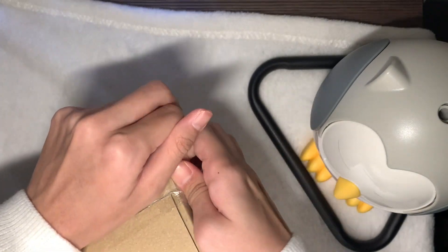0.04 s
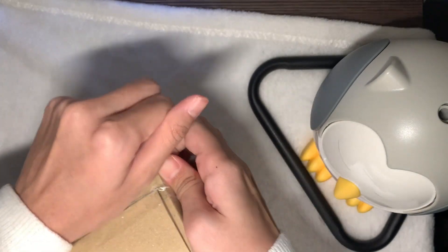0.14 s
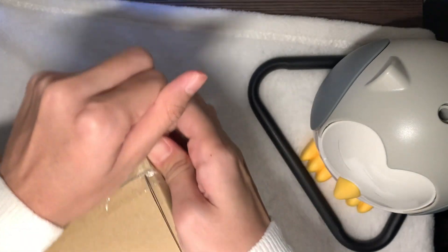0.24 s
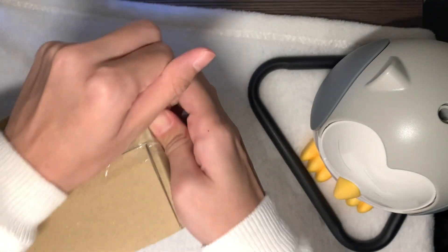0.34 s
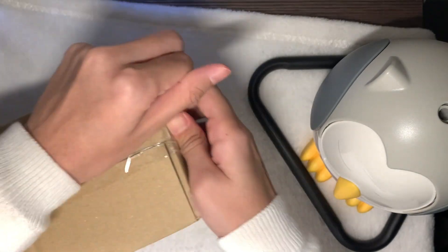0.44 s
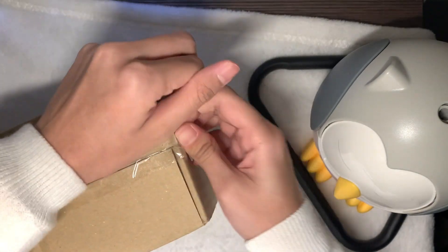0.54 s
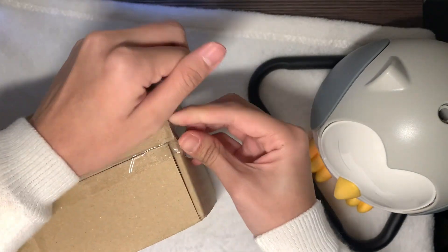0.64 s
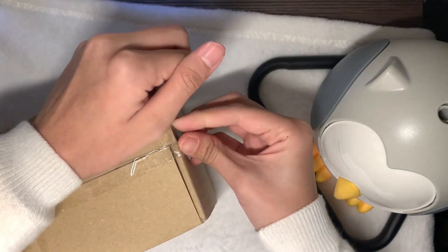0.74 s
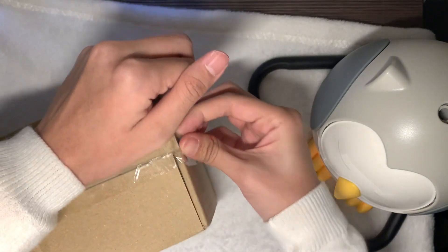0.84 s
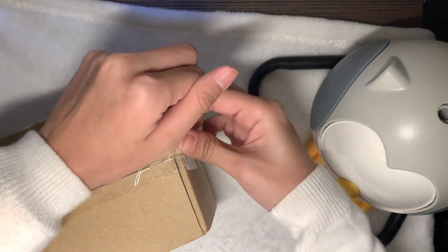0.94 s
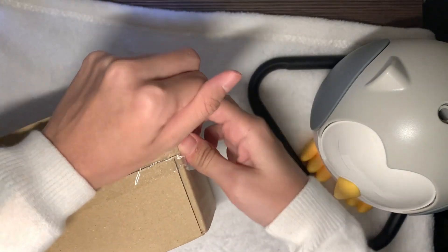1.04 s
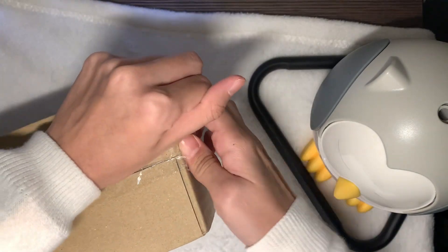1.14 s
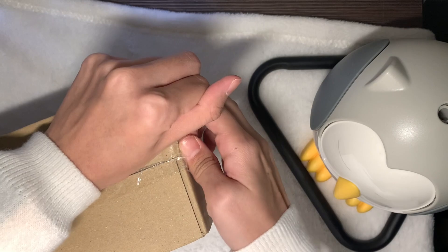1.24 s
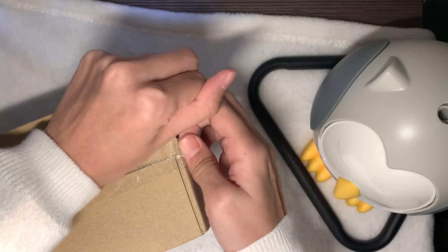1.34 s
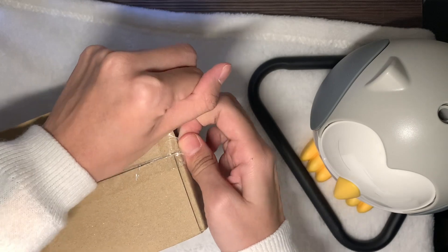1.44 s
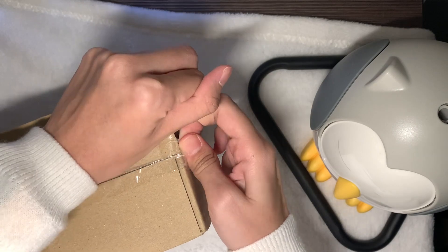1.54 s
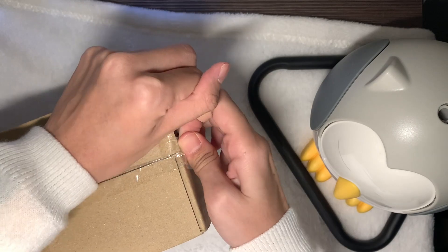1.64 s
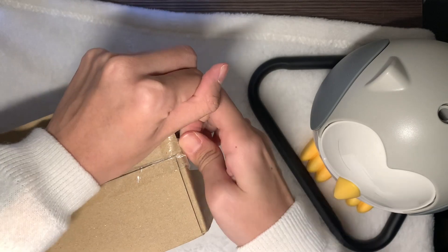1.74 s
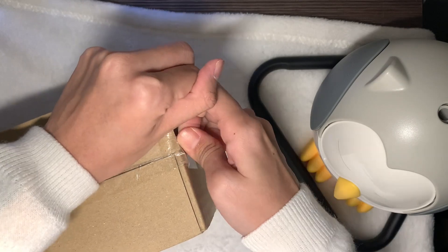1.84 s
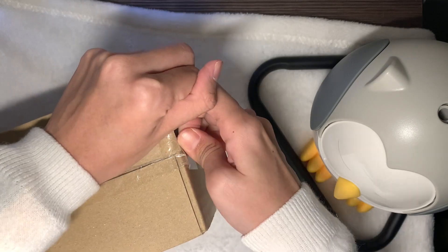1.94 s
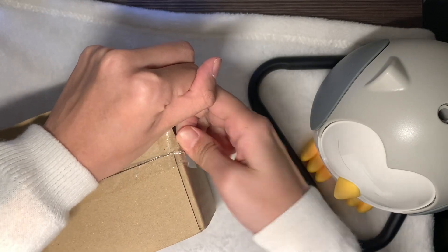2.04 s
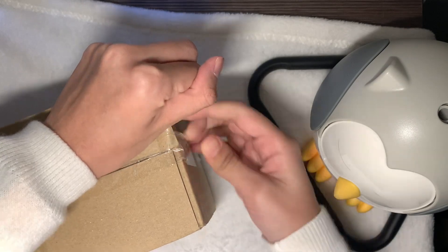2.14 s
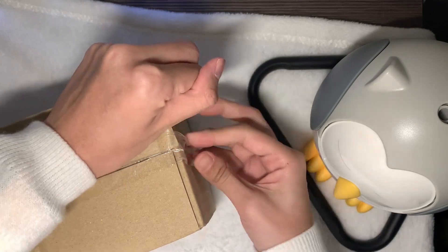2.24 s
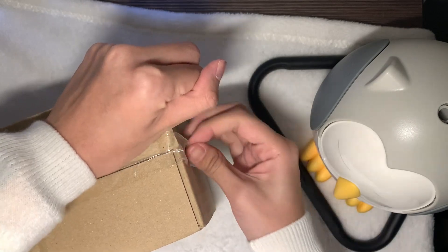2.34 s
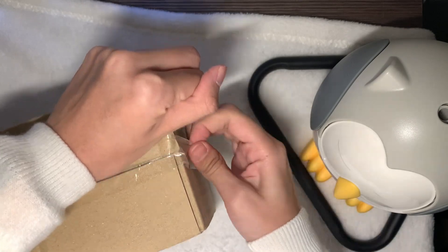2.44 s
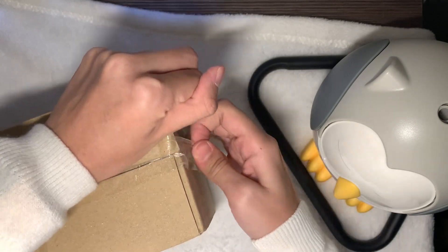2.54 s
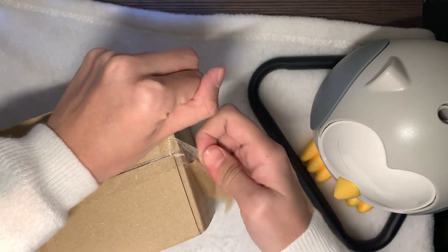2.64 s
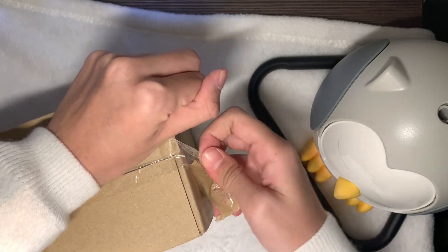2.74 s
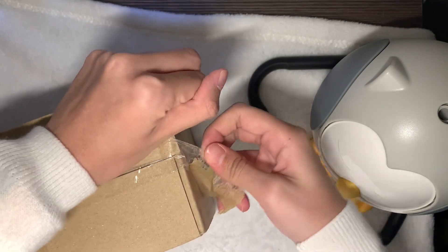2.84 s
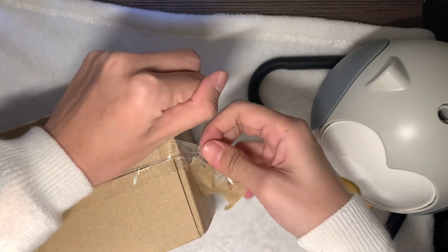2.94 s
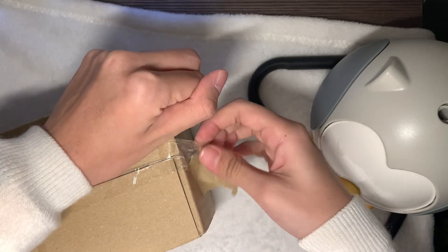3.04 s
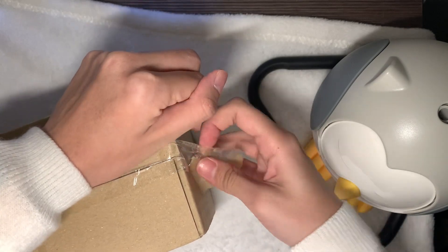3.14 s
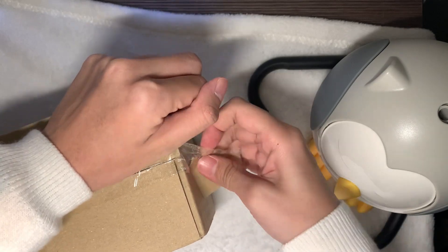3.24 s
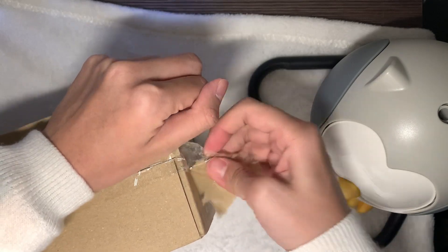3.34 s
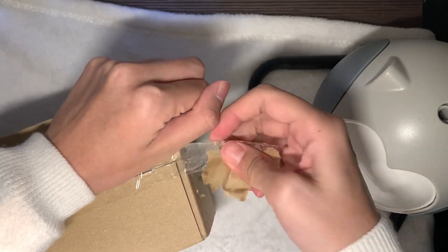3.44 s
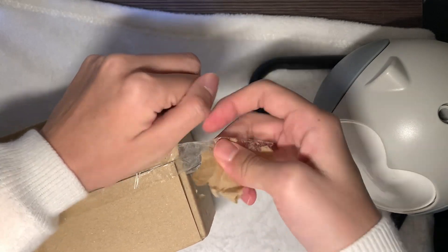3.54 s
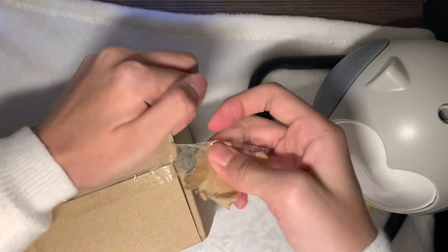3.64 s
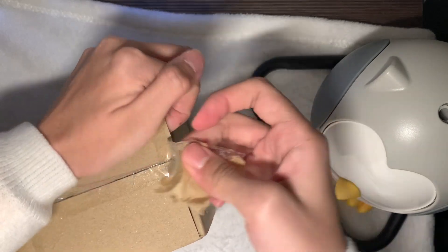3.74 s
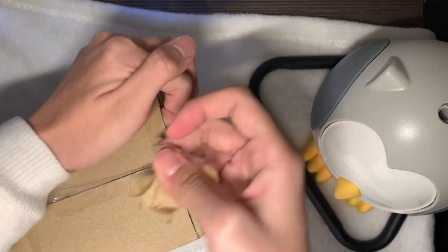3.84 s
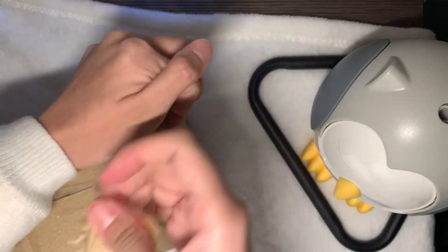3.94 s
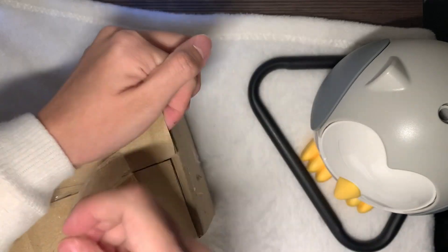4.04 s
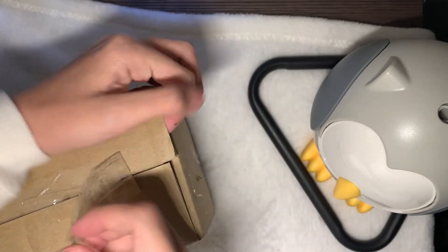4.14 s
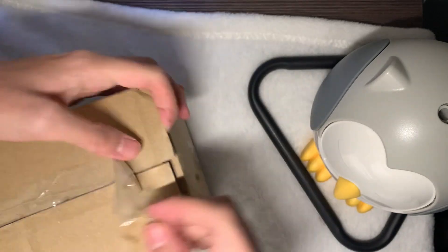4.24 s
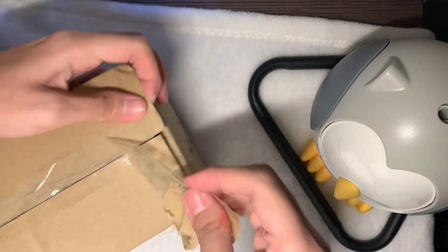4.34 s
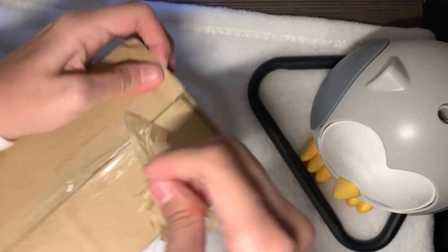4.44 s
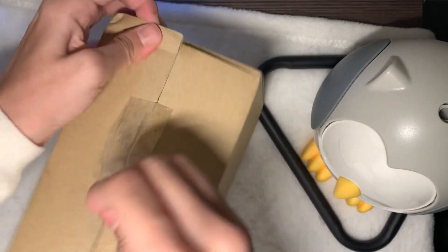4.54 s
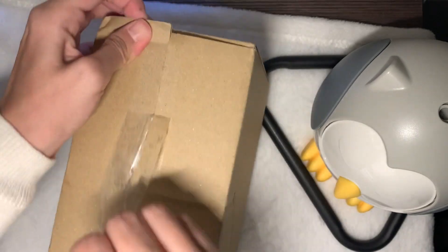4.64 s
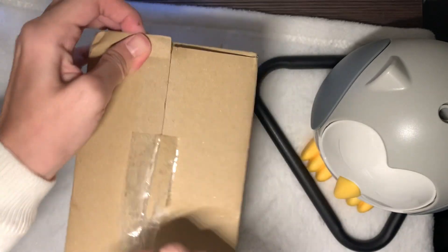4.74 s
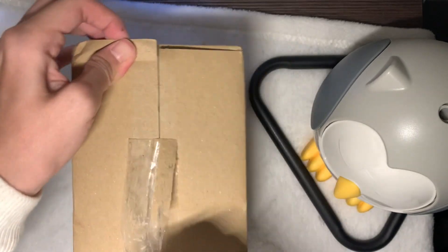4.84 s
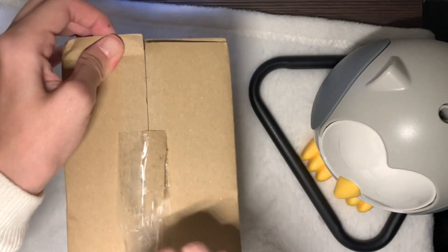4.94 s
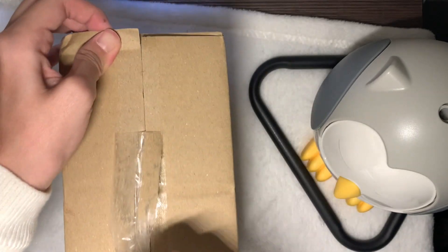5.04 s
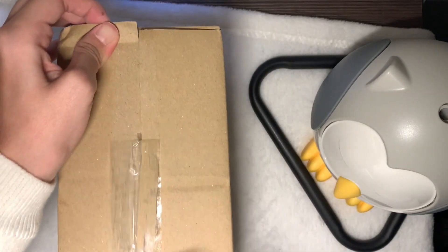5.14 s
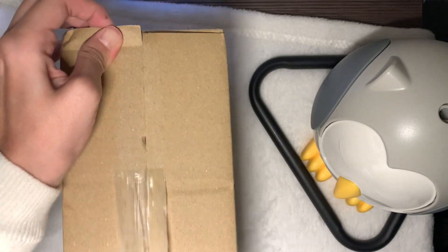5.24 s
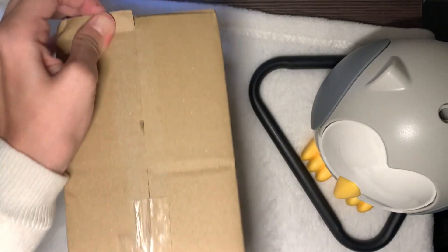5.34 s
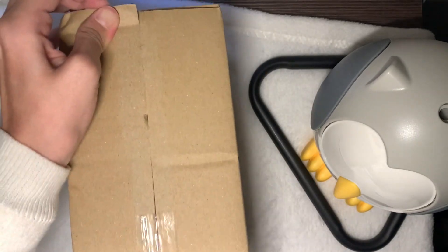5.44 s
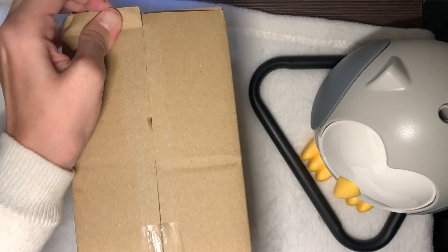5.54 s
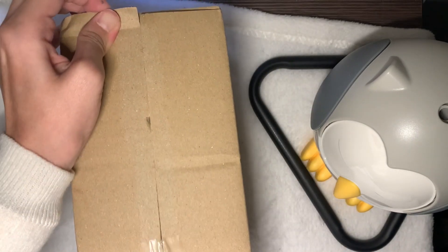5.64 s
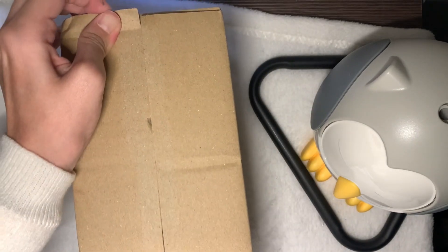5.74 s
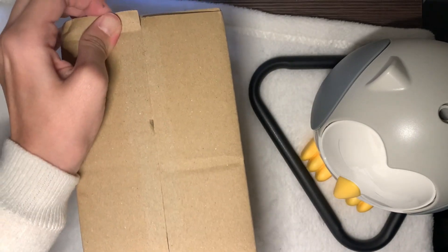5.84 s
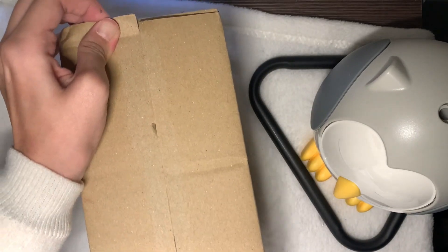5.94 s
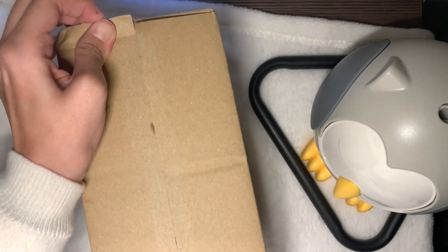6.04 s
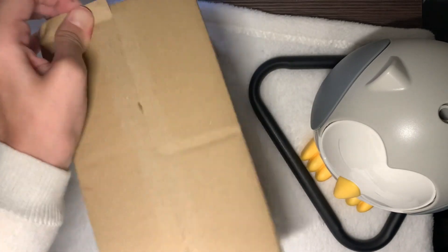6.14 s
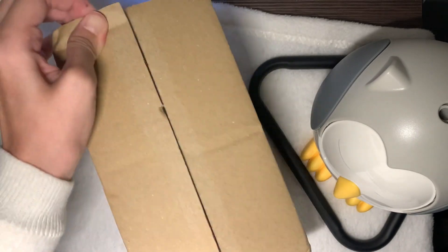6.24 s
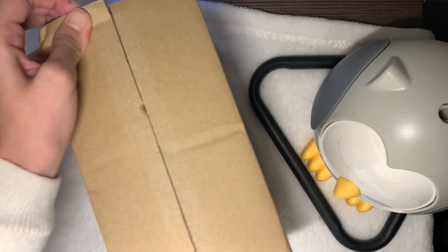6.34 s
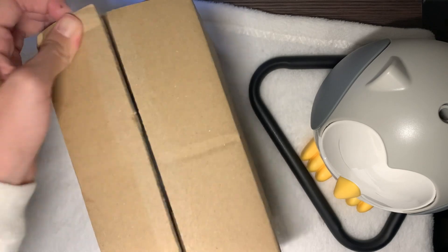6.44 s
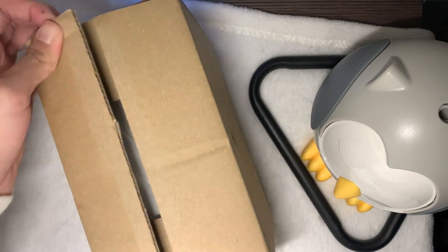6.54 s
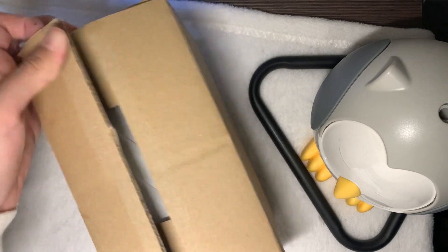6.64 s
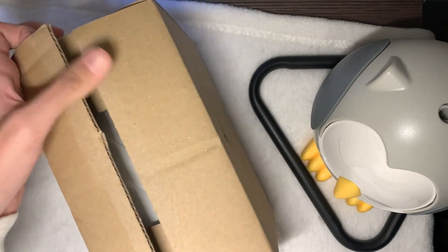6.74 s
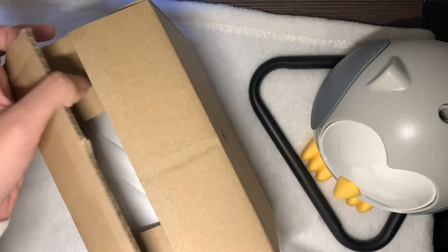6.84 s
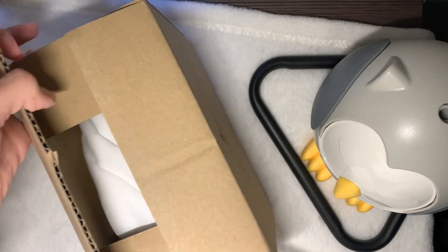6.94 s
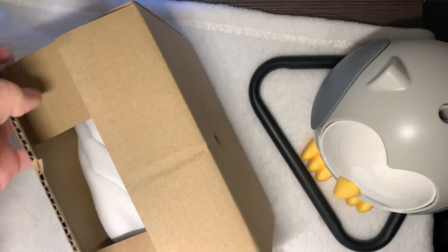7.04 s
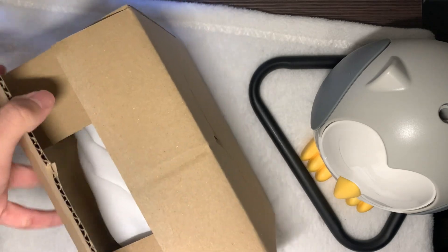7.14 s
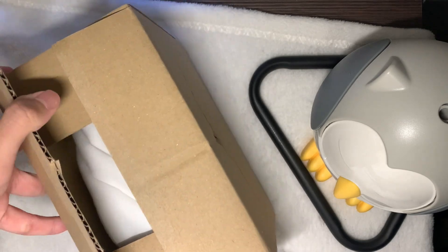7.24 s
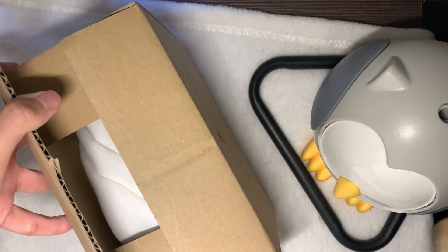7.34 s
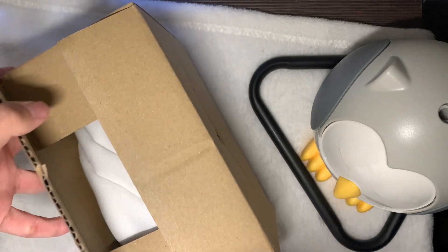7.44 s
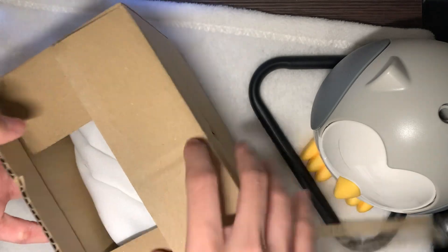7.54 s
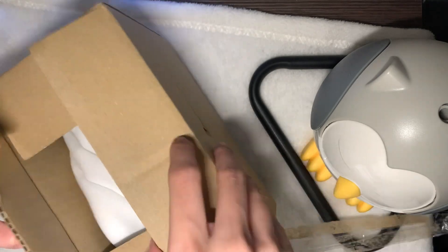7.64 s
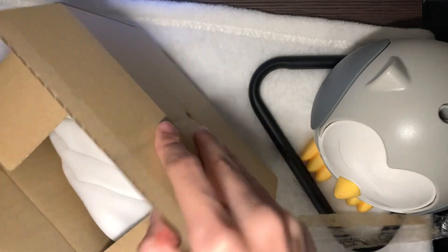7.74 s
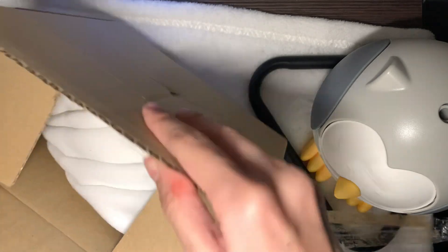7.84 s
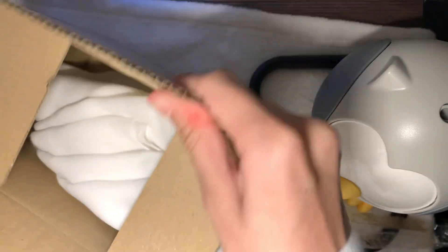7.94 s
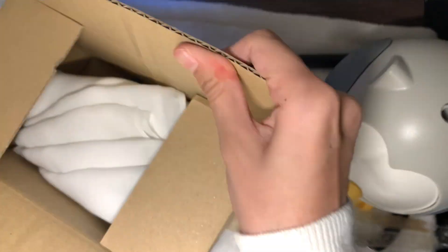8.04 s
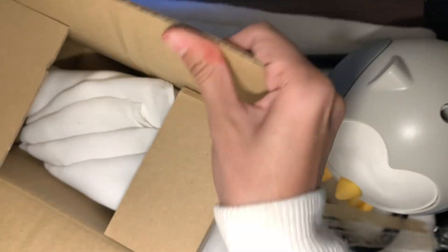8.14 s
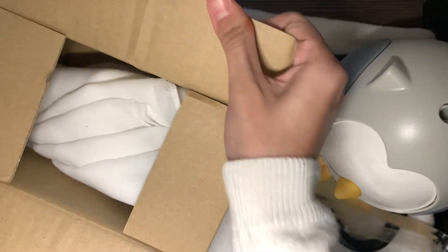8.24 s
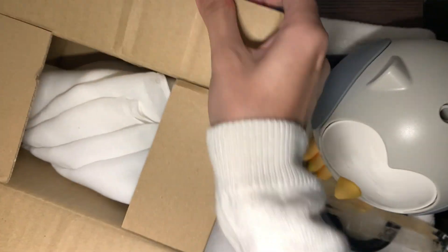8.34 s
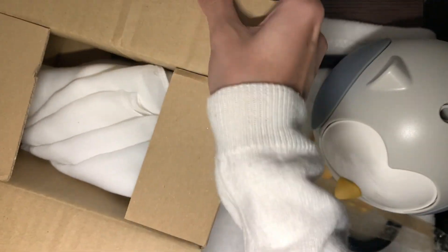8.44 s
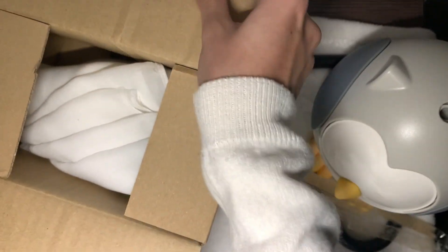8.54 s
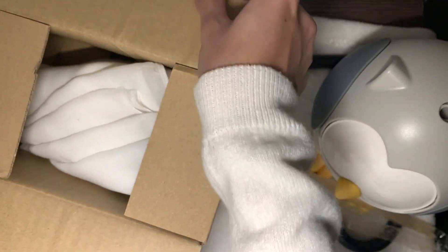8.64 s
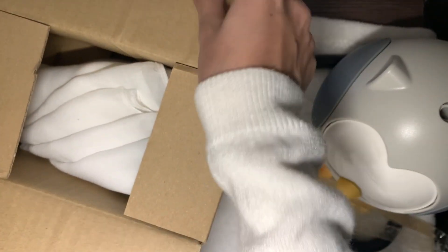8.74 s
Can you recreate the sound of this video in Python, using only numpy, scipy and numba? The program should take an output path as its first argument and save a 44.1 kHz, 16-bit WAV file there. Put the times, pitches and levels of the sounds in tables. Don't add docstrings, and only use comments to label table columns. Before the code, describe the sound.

Very close to the microphone in a quiet, dry room with faint low hum, fingernails pick at tape on a small cardboard box with crisp ticks. Tape tears in short bright bursts, with sharp snaps and hollow box knocks, then a longer rasping rip. A strong thump frees it; afterwards scraps crackle lightly and dry hands brush over the opening flaps with a few dull bumps.

```python
import sys
import numpy as np
from scipy import signal
from scipy.fft import rfft, irfft
from scipy.io import wavfile
from scipy.ndimage import uniform_filter1d
from numba import njit

SR = 44100
rng = np.random.default_rng(int(sys.argv[2]) if len(sys.argv) > 2 else 0)


def pcm_store(signal):
    levels = np.round(np.clip(np.atleast_2d(signal), -1, 1) * 32767)
    wavfile.write(sys.argv[1], SR, levels.astype(np.int16).T)


def undo_db(level):
    steps = np.asarray(level, float) / 20
    return 10 ** steps


N = 387638

# (frequency [Hz], level [dB per Hz])
HUSH_TONE = [(30, -6), (80, 2.5), (427, -17.5), (545, -39.5), (1020, -27.5), (2760, -49), (8360, -45.5),
             (10500, -100), (16000, -50)]
HUSH_DB, HUM_DB, HUM_HZ = -50.5, -39, 48.8
ROOM_T60_S, ROOM_DB = .035, -8.5
FILM_LAG, WALL_LAG = 6.633, -4

# (frequency [Hz], width [Hz], level [dB])
BOX_MODES = [(141, 20, -4.5), (214.3, 38, 4.5), (313.5, 30, -1), (408, 34, 3), (607, 18, -10),
             (784, 40, -6.5), (953, 22, -13.5), (1440, 42, -10), (1950, 250, -3.5)]
# (frequency [Hz], level [dB per Hz])
FILM_TONE = [(2000, -22.5), (4500, -26.5), (6000, -8.5), (7500, -6.5), (9500, 0), (13000, 1.5),
             (15700, 0.5), (16300, -30.5)]
# (frequency [Hz], level [dB per Hz])
SNAP_TONE = [(800, -28.5), (2000, -12), (3500, -9), (5500, -7), (7500, 1), (9500, 8), (13000, 13),
             (16500, -12)]
# (frequency [Hz], level [dB per Hz])
PAPER_TONE = [(240, -15.5), (400, 19), (600, 0.5), (1230, -9.5), (1450, -2.5), (2000, -12.5), (2400, -50)]

# (time [s], peak [dB], wall pitch [Hz])
KNOCKS = [(0.026, -24, 382), (0.817, -28, 131), (0.946, -25.5, 361), (1.163, -30.5, 420),
          (1.339, -29.5, 430), (1.516, -27.5, 507), (1.643, -22, 396), (2.116, -19.5, 422),
          (2.273, -19.5, 400), (2.536, -14, 643), (2.851, -27.5, 306), (3.079, -14.5, 417),
          (3.117, -18, 454), (3.268, -13.5, 615), (3.475, -28, 225), (3.667, -23, 395), (3.865, -14.5, 243),
          (3.87, -21.5, 87), (4.52, -15.5, 91.5), (4.287, -26.5, 108), (4.475, -7, 380), (5.067, -21, 108),
          (5.222, -12.5, 154), (7.526, -17.5, 200), (4.965, -28, 335), (5.191, -12.5, 200),
          (5.423, -14, 155), (5.635, -18, 129), (5.961, -18, 124), (6.038, -9, 144), (6.13, -5.5, 420.4),
          (6.604, -14, 137), (6.731, -22.5, 132), (7.494, -7, 232.1), (8.038, -28.5, 216.3)]
# (time [s], peak [dB], pitch [Hz])
TICKS = [(0.036, -28, 760), (0.095, -30.5, 1950), (0.587, -37, 637), (1.123, -36.5, 987),
         (1.168, -32.5, 2000), (1.255, -36.5, 980), (1.342, -32, 984), (1.646, -23.5, 812),
         (2.064, -37.5, 2028), (2.125, -19, 1930), (2.314, -30.5, 745), (2.474, -21.5, 836),
         (2.568, -12.5, 650), (2.951, -25.5, 980), (3.153, -20.5, 817), (3.475, -25, 607),
         (3.658, -34.5, 1071), (3.837, -27.5, 950), (4.29, -26.5, 760), (8.123, -31.5, 870),
         (5.4205, -22, 2020), (5.856, -31, 1745), (6.025, -19, 800), (6.107, -15, 607), (6.458, -22.5, 760),
         (6.601, -27.5, 990), (7.496, -21, 600), (7.527, -28.5, 780), (7.65, -27, 793.2), (8.04, -29, 834),
         (0.137, -38, 830), (0.198, -38, 2280), (0.282, -40.5, 605), (0.717, -40, 650), (0.819, -35, 1025),
        (1.306, -39, 826), (1.472, -36, 990), (1.528, -32.5, 790), (2.278, -27, 800), (3.084, -33, 635.6),
        (3.119, -34.5, 608), (3.262, -25, 635), (3.516, -31.5, 800), (4.086, -34, 1010), (4.361, -35, 1060),
        (4.455, -39.5, 600.4), (5.943, -30.5, 829), (6.903, -35.5, 1110), (7.475, -36, 626),
        (7.636, -28.5, 734), (7.723, -37.5, 800), (7.76, -33, 630), (8.002, -36, 798), (8.094, -35, 807),
        (8.153, -40, 776), (8.296, -42, 1420), (8.393, -36.5, 636), (8.763, -36, 1497), (8.71, -37.5, 1520),
        (8.6, -43.5, 1420)]

# (peak time [s], boom [dB], rise per 20 dB [s], fall per 20 dB [s], slip rate [Hz])
STRAINS = [(.05, -42, 0.6, 0.38, 248.2), (1.53, -41, 0.13, 0.13, 400), (2.3, -30, 0.07, 0.2, 377.9),
           (2.565, -20, 0.0965, 0.1, 490.3), (2.94, -43.5, 0.39, 0.14, 170),
           (3.15, -22, 0.067, 0.0752, 419.2), (3.31, -23.5, 0.06, 0.06, 434), (3.5, -38, 0.16, 0.26, 202.1),
           (3.675, -36, -0.05, 0.05, 396.2), (4.52, -18.5, 0.08, 0.12, 156.5), (4.68, -36, 0.02, 0.09, 380),
           (5.23, -18.5, 0.113, 0.01, 150), (5.12, -24, 0.18, 0.11, 160), (5.29, -21, 0.0954, 0.04, 365.2),
           (5.65, -30.5, 0.59, 0.33, 160.2), (6.03, -25, 0.066, 0.096, 330),
           (6.07, -20.5, 0.14, 0.1, 134.2), (6.14, -15, 0.0257, 0.05, 432.2),
           (6.735, -32, 0.03, 0.11, 148.7), (7.64, -37, 0.07, 0.53, 220), (8.04, -35, 0.15, 0.61, 159.7)]
# (peak time [s], boom [dB], slip rate [Hz])
JOLTS = [(.83, -37.5, 276), (.95, -44.5, 265), (2.13, -28, 332.4), (2.469, -33.5, 435.5),
         (3.086, -31.5, 416), (3.87, -23, 340.8), (4.48, -20.5, 334.8), (5.43, -30, 155.8),
         (6.61, -34, 150), (7.505, -26, 209), (8.404, -38.5, 200.4), (6.82, -42, 150), (8.19, -39, 180),
         (4.03, -43, 399.9), (7.76, -40, 399.6), (6.11, -22, 469.3), (7.532, -29, 230)]
# (start [s], end [s], first level [dB], last level [dB])
GRIPS = [
    (.19, .78, -51, -51),
    (.98, 1.47, -46.5, -46),
    (1.72, 2.05, -51.5, -49.5),
    (3.94, 4.41, -42.5, -48.5),
    (6.24, 6.58, -47, -51),
]
JOLT_RISE_S, JOLT_FALL_S, STOP_S = .02, .05, .03
BOX_REST_DB, REST_HZ, GRIP_HZ = -58, 115.54, 139.44

# (peak time [s], level [dB], rise per 20 dB [s], fall per 20 dB [s])
SLIDES = [(6.76, -42.5, 0.13, 0.14), (6.8, -42.5, 0.15, 0.08), (6.9, -39.5, 0.14, 0.01),
          (7.065, -41, 0.3, 0.16), (7.497, -33, 0.012, 0.03), (7.53, -31, 0.015, 0.018),
          (7.585, -40, .03, .05), (7.604, -30, 0.03, 0.018), (7.66, -51, .08, .1),
          (7.73, -37.5, 0.17, 0.25), (7.88, -47, 0.27, 0.4), (8.0, -42, 0.3, 0.18), (8.14, -41, 0.16, 0.18),
          (8.32, -48, 0, -0.5), (8.4, -44.5, 0.1, 0.04), (8.64, -42.5, 0.14, 0.34), (8.7, -47.5, 0, -0.5)]
# (peak time [s], level [dB], rise per 20 dB [s], fall per 20 dB [s])
PULLS = [(0.921, -47.5, .06, .3), (2.125, -42, .03, .03), (2.548, -20, 0.08, 0.085), (2.48, -28, .015, .1),
         (2.91, -49, .02, .03), (3.18, -33, .09, .015), (3.3, -21, .11, .05), (3.338, -18, .05, 0.04),
         (3.672, -48, .01, 0.05), (3.774, -43, 0.1, .05), (3.86, -23.5, 0.04, 0.1), (3.948, -32, .05, .08),
         (4.1, -45, .06, .04), (4.24, -33, .02, .05), (4.398, -38, .08, .03), (4.48, -24.5, .06, .1),
         (4.54, -25, .1, .09), (4.62, -32, .1, .04), (5.241, -23, 0.27, .2), (5.3, -28, .05, .11),
         (5.08, -30, .1, .1), (5.542, -35, .08, .1), (5.665, -29, .15, .1), (5.738, -27, .025, .02),
         (5.78, -34, .06, .06), (5.95, -34, .05, .1), (6.045, -23, 0.1, 0.15), (6.125, -23, 0.12, 0.065),
         (6.39, -46, .008, .02), (6.462, -38, .01, .015), (6.517, -44, .008, .012),
         (6.59, -38, .012, 0.025)]
# (start [s], end [s], first level [dB], last level [dB])
RUSTLES = [(.09, .29, -49, -51.5), (.36, .61, -62, -59.5), (1.54, 1.96, -36, -46.5),
           (2.16, 2.4, -54, -48.5), (2.62, 2.68, -42.5, -38), (2.72, 3.04, -49.5, -58.5),
           (3.2, 3.23, -51, -48.5), (3.52, 3.6, -47, -50.5), (4.02, 4.42, -51, -50),
           (4.67, 4.95, -51.5, -55.5), (4.97, 5.06, -37.5, -36.5), (2.04, 2.12, -54, -46),
           (3.36, 3.41, -51, -54.5), (5.38, 5.52, -37.5, -41), (5.8, 5.92, -39.5, -41.5),
           (6.24, 6.57, -67, -59)]
FILM_REST_DB = -72
# (time [s], level [dB])
FULLNESS = [(0, 2), (2.4, 6.5), (2.55, 3.5), (3.1, 0.5), (4.55, -0.5), (4.95, -2.5), (5.95, -7), (6.1, 2.5),
            (6.25, 6.5), (6.62, 10), (6.7, 1.5), (7.25, -0.5), (7.5, 0), (8.35, 0.5), (8.5, -4.5)]

# (time [s], peak [dB], body [dB])
PICKS = [(0.0927, -33, -42), (0.1974, -34, -48), (0.2359, -31, -53), (0.2593, -34, -54), (0.2857, -32, -58),
         (0.3187, -34, -62), (0.5352, -37, -56), (0.5856, -40, -56), (0.6035, -31, -73), (0.816, -38, -49),
         (0.8445, -24, -53), (0.9134, -30, -71), (0.9198, -27, -61), (0.9393, -31, -60), (0.9762, -32, -61),
         (0.9991, -32, -60), (1.057, -31, -68), (1.0849, -26, -53), (1.1214, -40, -47), (1.1483, -38, -63),
         (1.1628, -32, -60), (1.1675, -31, -45), (1.1842, -33, -59), (1.1997, -29, -64), (1.2516, -48, -51),
         (1.3404, -31, -47), (1.4401, -46, -55), (1.5055, -29, -59), (1.5184, -17, -50), (1.5344, -13, -53),
         (1.5524, -18, -58), (1.5694, -18, -57), (1.6442, -17, -35), (1.6891, -9, -47), (1.727, -20, -57),
         (1.7634, -25, -56), (1.8118, -20, -46), (1.8228, -19, -46), (1.8364, -24, -55), (1.8731, -21, -57),
         (1.8864, -23, -63), (1.9096, -21, -64), (2.0338, -27, -53), (2.0627, -16, -48), (2.0792, -18, -60),
         (2.0981, -20, -50), (2.1241, -22, -33), (2.2433, -30, -65), (2.2543, -28, -51), (2.2832, -30, -47),
         (2.3231, -23, -50)]
# (time [s], peak [dB], body [dB])
SNAPS = [(2.3994, -25, -58), (2.4264, -16, -53), (2.4703, -16, -38), (2.6764, -21, -51), (2.6933, -7, -49),
         (2.7227, -14, -57), (2.7681, -22, -60), (2.9083, -26, -62), (2.9487, -18, -46), (2.9776, -16, -50),
         (3.0395, -35, -55), (3.0619, -15, -52), (3.1552, -23, -39), (3.3877, -22, -55), (3.4745, -22, -44),
         (3.5084, -26, -58), (3.5139, -18, -53), (3.6581, -18, -46), (3.7549, -31, -61), (3.7663, -20, -55),
         (3.8362, -12, -42), (3.9689, -15, -51), (4.0088, -26, -61), (4.0851, -25, -52), (4.1185, -14, -47),
         (4.1619, -25, -53), (4.2363, -18, -54), (4.2887, -13, -39), (4.3296, -27, -56), (4.36, -23, -50),
         (4.3799, -25, -58), (4.4408, -19, -51), (4.4538, -9, -42), (4.7795, -33, -65), (4.81, -21, -62),
         (4.8174, -24, -61), (4.8304, -9, -52), (4.9601, -23, -49), (4.9931, -12, -53), (5.014, -17, -42),
         (5.1657, -5, -45), (5.3961, -17, -48), (5.4203, -2, -28), (5.4235, -24, -31), (5.5338, -14, -56),
         (5.696, -13, -55), (5.7564, -17, -58), (5.7828, -15, -61), (5.8177, -17, -62), (5.8334, -18, -42),
         (5.8551, -22, -41), (5.8995, -4, -56)]
# (time [s], peak [dB], body [dB])
SCRAPS = [(6.2497, -41, -66), (6.2706, -39, -63), (6.2971, -30, -59), (6.3435, -34, -71),
          (6.3639, -30, -61), (6.3859, -26, -58), (6.3914, -28, -60), (6.4124, -32, -58),
          (6.4283, -20, -57), (6.4414, -27, -45), (6.4562, -19, -38), (6.4614, -17, -38),
          (6.4931, -25, -54), (6.5154, -22, -59), (6.5241, -18, -57), (6.5774, -25, -48),
          (6.5859, -19, -41), (6.6263, -28, -58), (6.7311, -35, -57), (6.8788, -28, -56),
          (6.9017, -28, -49), (7.201, -36, -66), (7.3038, -30, -61), (7.4739, -27, -49), (7.4914, -19, -44),
          (7.5263, -19, -45), (7.6006, -20, -44), (7.9867, -29, -56), (8.0396, -36, -53),
          (8.3823, -36, -64), (8.3948, -34, -55)]
RATTLE_S, BODY_LAG_S = .012, .0015

# (from [Hz], to [Hz], chance in the sum [0-1], chance in the difference [0-1])
SILENT_BANDS = [(2250, 2750, .6, .05), (2750, 5600, .33, .3), (5600, 6900, .03, .5), (8500, 9000, .55, 0),
                (9000, 10300, .92, 0), (10300, 10900, .3, 0), (12300, 14000, 0, .8), (16000, 20000, 1, 1)]


def colour(x, points):
    hz, db = np.transpose(points)
    size = 2048
    grid = np.maximum(np.arange(size // 2 + 1) * SR / size, 1)
    ceps = irfft(np.interp(np.log(grid), np.log(hz), db) * np.log(10) / 20)
    ceps[1:size // 2] *= 2
    ceps[size // 2 + 1:] = 0
    return signal.fftconvolve(x, irfft(np.exp(rfft(ceps))))[:N]


def butter(x, order, hz, kind):
    return signal.sosfilt(signal.butter(order, hz, kind, fs=SR, output="sos"), x)


def unit(x, lo_hz, hi_hz):
    power = np.abs(rfft(x)) ** 2
    return x * N / np.sqrt(2 * power[int(lo_hz * N / SR):int(hi_hz * N / SR)].sum())


@njit
def svf(x, hz, width):
    y, band, low = np.empty(len(x)), 0., 0.
    for i in range(len(x)):
        g, k = np.tan(np.pi * hz[i] / SR), width[i] / hz[i]
        v = (band + g * (x[i] - low)) / (1 + g * (g + k))
        band, low, y[i] = 2 * v - band, low + 2 * g * v, k * v
    return y


def walk(rate):
    k = int(SR / rate)
    held_levels = np.repeat(rng.standard_normal(N // k + 1), k)
    return 1.3 * uniform_filter1d(uniform_filter1d(held_levels, k), k)[:N]


def grains(density, spread_db):
    density = np.clip(density, .002, 1)
    size = undo_db(spread_db * np.minimum(rng.exponential(size=N), 6.5))
    sounding = rng.random(N) < density
    return size * rng.standard_normal(N) * sounding / np.sqrt(density)


def room():
    turn = 2 * np.pi * np.cumsum(HUM_HZ + 1.2 * walk(4)) / SR
    hum = np.sqrt(2) * undo_db(HUM_DB + .8 * walk(6)) * np.sin(turn)
    mid, side = (unit(colour(rng.standard_normal(N), HUSH_TONE), 76, 2000) for _ in range(2))
    side = butter(side, 1, 600, "high")
    opposite = np.array([[1], [-1]])
    lean = undo_db(np.array([[-.6], [.6]])) + 0.16 * walk(9) * opposite
    return lean * hum + undo_db(HUSH_DB) * (mid + side * opposite)


def ports(x, lag, diffuse):
    turn = np.exp(-1j * np.pi * lag * np.arange(N // 2 + 1) / N)
    t = np.arange(SR // 4) / SR
    tails = rng.standard_normal((2, len(t))) * undo_db(-60 * t / ROOM_T60_S)
    tails /= np.sqrt(np.sum(tails ** 2, axis=1, keepdims=True))
    tails = butter(tails, 2, 450, "high")
    direct = np.array([irfft(rfft(x) / turn, N), irfft(rfft(x) * turn, N)])
    return direct + diffuse * signal.fftconvolve(x[None], tails, axes=1)[:, :N]


def swell(s, db, rise_s, fall_s, hold_s=0, last_db=None):
    last_db = db if last_db is None else last_db
    rise_s, fall_s = max(rise_s, .004), max(fall_s, .004)
    start, end = s - rise_s, s + hold_s + 1e-4
    stop = end + fall_s
    times = [start - 3 * min(rise_s, STOP_S), start, s, end, stop, stop + 3 * min(fall_s, STOP_S)]
    levels = [db - 80, db - 20, db, last_db, last_db - 20, last_db - 80]
    return undo_db(2 * np.interp(np.arange(N // 44 + 2) * 44 / SR, times, levels))


def held(table):
    return [swell(a, db, STOP_S, STOP_S, b - a, last_db) for a, b, db, last_db in table]


def hands():
    peel = undo_db(2 * FILM_REST_DB) + sum(swell(*row) for row in PULLS) + sum(held(RUSTLES))
    slid = undo_db(2 * FILM_REST_DB) + sum(swell(*row) for row in SLIDES)
    rows = STRAINS + [(s, db, JOLT_RISE_S, JOLT_FALL_S, hz) for s, db, hz in JOLTS]
    loads = [(swell(s, db, up, down), hz) for s, db, up, down, hz in rows]
    loads += [(power, GRIP_HZ) for power in held(GRIPS)]
    rest = undo_db(2 * BOX_REST_DB)
    strain = rest + sum(power for power, _ in loads)
    rate_hz = (rest * REST_HZ + sum(power * hz for power, hz in loads)) / strain
    peel_db, slide_db, boom_db = (10 * np.log10(power) for power in (peel, slid, strain))
    rasp_db = -44.5 + 0.68 * (boom_db + 19.5) + 7.5 * np.log2(rate_hz / 150)
    rasp_db = rasp_db + 0.078 * (np.maximum(peel_db, slide_db) + 38.0)
    curves = peel_db, slide_db, boom_db, rate_hz, rasp_db
    return [np.interp(np.arange(N) / 44, np.arange(len(c)), c) for c in curves]


def slips(rate_hz):
    phase = np.cumsum(rate_hz * np.exp(0.16 * walk(120)) / SR)
    count = phase.astype(int)
    size = undo_db(6.16 * rng.standard_normal(N // 20))[count]
    tugs = size * (np.diff(count, prepend=0) > 0)
    return tugs, size * np.exp(-(phase % 1) / 0.73)


def ring_box(x):
    out = np.zeros(N)
    for hz, width, db in BOX_MODES:
        out += undo_db(db) * svf(x, np.full(N, float(hz)), np.full(N, float(width))) / np.sqrt(width)
    return out


def knocks():
    out, t = np.zeros(N), np.arange(SR // 4) / SR
    for s, peak_db, hz in KNOCKS:
        turn = 2 * np.pi * hz * (t + 0.00087 * (1 - np.exp(-t / 0.0078)))
        fade = undo_db(-60 * t / (0.023 + 7.7 / hz))
        onset = 1 - np.exp(-t / 0.0019)
        blow = (np.sin(turn) + 0.21 * fade * np.sin(2.516 * turn)) * fade * onset
        i = int((s + 0.0029) * SR)
        out[i:i + len(t)] += undo_db(peak_db + 3.5) * blow[:N - i]
    return out


def ticks():
    pings, contact, t = np.zeros(N), np.zeros(N), np.arange(SR // 16) / SR
    rows = TICKS
    for (s, peak_db, hz), burst in zip(rows, rng.standard_normal((len(rows), len(t)))):
        fade = np.exp(-t / 0.0059) + 0.18 * np.exp(-t / 0.016)
        scratch = 0.5 * butter(burst * fade, 3, [500, 2300], "band")
        ping = 0.7 * np.sin(2 * np.pi * hz * t) * np.exp(-t * hz / 4.7)
        i = int(s * SR)
        contact[i:i + len(t)] += undo_db(peak_db) * scratch[:N - i]
        pings[i:i + len(t)] += undo_db(peak_db) * ping[:N - i]
    ring = butter(ring_box(contact), 2, 650, "high")
    return pings + contact + 1.1 * ring * contact.std() / ring.std()


def wall_boom(tugs, rate_hz, db):
    push = tugs + 0.059 * rng.standard_normal(N)
    flap = svf(svf(push, rate_hz, 1.07 * rate_hz), rate_hz, 0.5 * rate_hz)
    flap /= np.sqrt(uniform_filter1d(flap ** 2, SR // 10))
    table = svf(rng.standard_normal(N), np.full(N, 85.), np.full(N, 50.))
    shake = flap + 0.41 * table / table.std()
    rub = ring_box(grains(.04, 2.76) * undo_db(6.3 * walk(60)))
    rub = unit(butter(rub, 2, 1500, "low"), 65, 1200)
    hard = np.clip((db + 54.5) / 22, 0, .9)
    return undo_db(db) * (np.sqrt(hard) * shake + np.sqrt(1 - hard) * rub)


def fibre_rasp(db, gate):
    fibres = grains(.1 * undo_db(.5 * (db + 36.5)), 2.8) * (.8 + gate)
    fibres = fibres * undo_db(1.4 * walk(30) + 1.6 * walk(120))
    through_walls = butter(ring_box(fibres), 2, [480, 2100], "band")
    rasp = unit(colour(fibres, PAPER_TONE), 730, 2200) + 1.63 * unit(through_walls, 600, 2380)
    return undo_db(db) * unit(rasp, 750, 3400)


def skin_slide(db):
    hiss = colour(grains(np.ones(N), 1.2), FILM_TONE)
    return undo_db(db + 2.4 * walk(40)) * unit(hiss, 11650, 15300)


def crinkle(db, gate):
    creases = []
    for _ in range(2):
        folds = grains(0.35 * undo_db(.5 * (db + 29.0)), 1.5) * (1.5 + gate)
        creases.append(unit(butter(folds, 3, [2700, 5600], "band"), 3200, 8100))
    return undo_db(0.96 * db - 17.5) * np.array(creases)


def film_spray(db, gate, full_db):
    cracks = grains(.4 * undo_db(.5 * (db + 31.0)), 2.2)
    flutter = undo_db(1.3 * walk(90) + 1.1 * walk(300))
    spray = colour(cracks * (1.6 + gate) * flutter, FILM_TONE)
    thin = 1 - undo_db(np.clip(0.31 * (db + 23.0), -6.0, 0) + full_db)
    lower = signal.butter(3, 9000, fs=SR, output="sos")
    spray = spray - thin * signal.sosfiltfilt(lower, spray)
    return undo_db(db) * unit(spray, 12080, 14400)


def film_snaps(full_db):
    out, t = np.zeros(N), np.arange(SR // 25) / SR - .004
    needle = np.exp(-np.abs(t) / .00035)
    rows = PICKS + SNAPS + SCRAPS
    for (s, peak_db, body_db), burst in zip(rows, rng.standard_normal((len(rows), len(t)))):
        rattle = undo_db(-60 * np.abs(t) / (RATTLE_S * undo_db(2.6 * burst[0])))
        crack = colour(burst * (needle + .15 * rattle), SNAP_TONE)[:len(t)]
        scrape = burst * (needle + 0.22 * rattle)
        dull = butter(scrape, 2, [1000, 6200], "band")
        board = butter(scrape, 3, [1000, 2300], "band")
        body = 0.54 * dull + np.roll(board, int(BODY_LAG_S * SR))
        snap = undo_db(peak_db + 4.5 + .5 * full_db[int(s * SR)]) * crack / np.abs(crack).max()
        snap = snap + undo_db(body_db + 16) * body / np.abs(body).max()
        i = int((s - .003) * SR)
        out[i:i + len(t)] += snap[:N - i]
    return out


def scene():
    peel_db, slide_db, boom_db, rate_hz, rasp_db = hands()
    peel_db = peel_db + 2.0
    full_db = np.interp(np.arange(N) / SR, *np.transpose(FULLNESS))
    tugs, gate = slips(rate_hz)
    box = wall_boom(tugs, rate_hz, boom_db) + fibre_rasp(rasp_db, gate) + knocks() + ticks()
    box_lean = undo_db(np.array([[-.3], [.3]]))
    tape = film_spray(peel_db, gate, full_db) + film_snaps(full_db) + skin_slide(slide_db)
    loose_tape = undo_db(full_db) * crinkle(np.maximum(peel_db, slide_db), gate)
    near = ports(tape, FILM_LAG, undo_db(ROOM_DB)) + loose_tape
    return room() + box_lean * ports(box, WALL_LAG, undo_db(ROOM_DB + 1.5)) + near


def silence_bands(x):
    size = 2048
    hz, _, spec = signal.stft([x[0] + x[1], x[0] - x[1]], SR, "cosine", nperseg=size)
    frames = spec.shape[2]
    edge = uniform_filter1d(np.diff(x[0], prepend=0) ** 2, size=64)
    edge = np.pad(edge, (size // 4, size))[:frames * size // 2].reshape(-1, size // 2)
    mean_edge = edge.mean(axis=1)
    calm = edge.max(axis=1) < 9 * mean_edge
    busy = mean_edge > 30 * np.median(mean_edge)
    group = (12 * np.log2(hz + 2000)).astype(int)
    group[(hz > 8000) & (hz < 11000)] = 0
    chance = rng.random((2, group.max() + 1, frames))[:, group]
    lasting = (hz > 8000) | (hz < 2750)
    chance[:, lasting] = np.repeat(chance[:, lasting], 4, axis=2)[..., :frames]
    chance[:, hz < 2750] *= np.where(busy, .5, 2)
    for lo, hi, *odds in SILENT_BANDS:
        band = (hz >= lo) & (hz < hi)
        shut = chance[:, band] < np.reshape(odds, (2, 1, 1))
        spec[:, band] *= ~(calm & shut)
    total, differ = signal.istft(spec, SR, "cosine", nperseg=size)[1][:, :N]
    return np.array([total + differ, total - differ]) / 2


def band_limit(x):
    return signal.sosfilt(signal.butter(12, 16990, fs=SR, output="sos"), x)


def record(dry):
    heard = butter(dry, 4, 36, "high")
    rounded = np.tanh(0.9 * heard) / 1.254
    mix = silence_bands(rounded)
    return band_limit(mix)


dry = scene()
out = record(dry)
pcm_store(out)
```